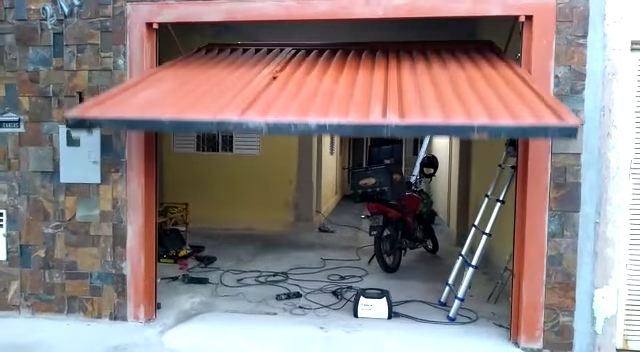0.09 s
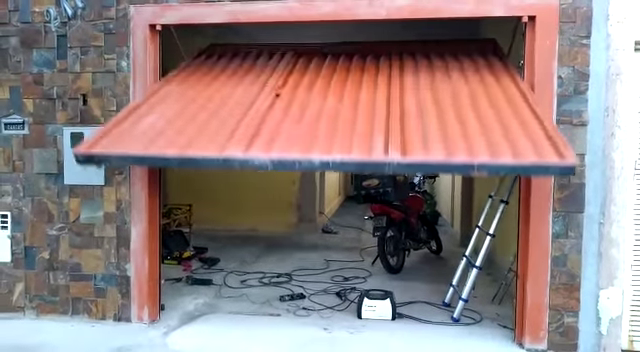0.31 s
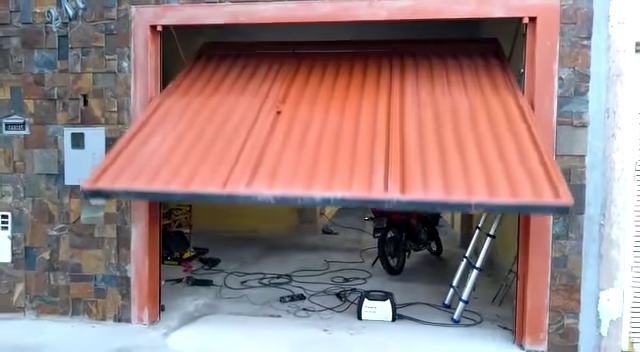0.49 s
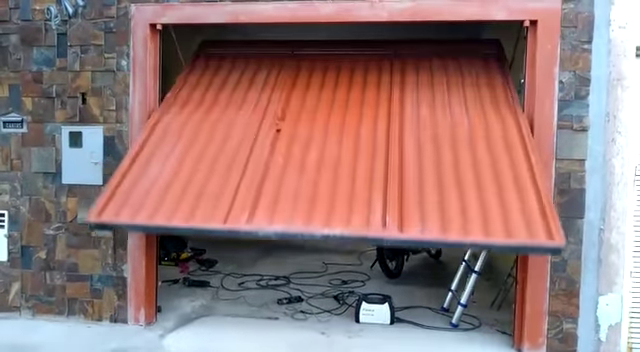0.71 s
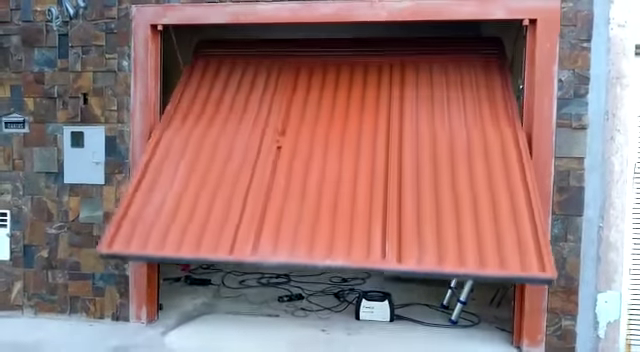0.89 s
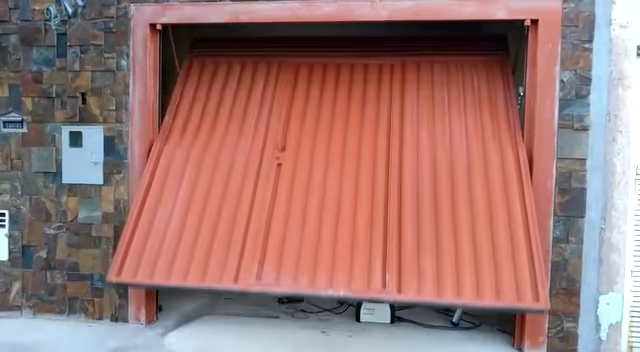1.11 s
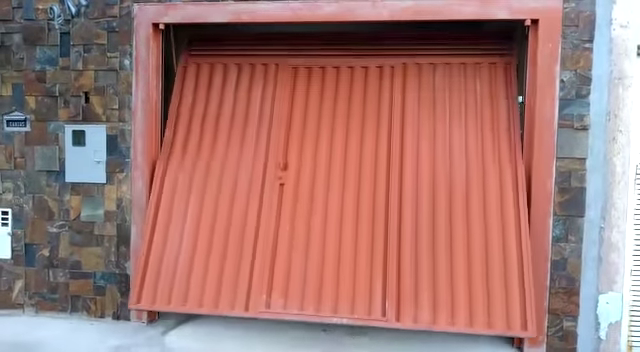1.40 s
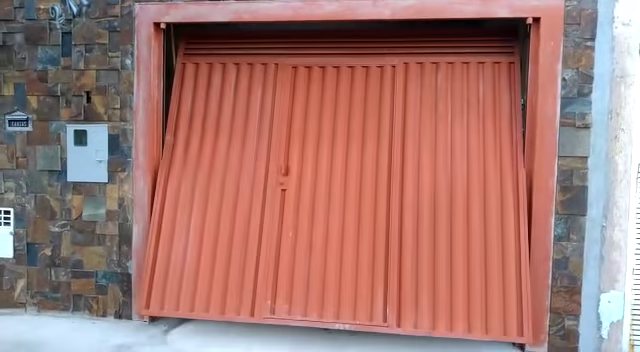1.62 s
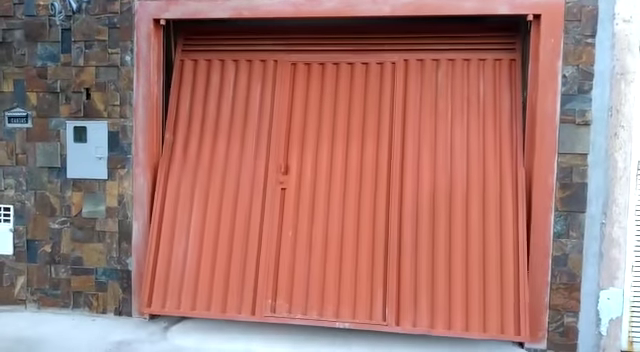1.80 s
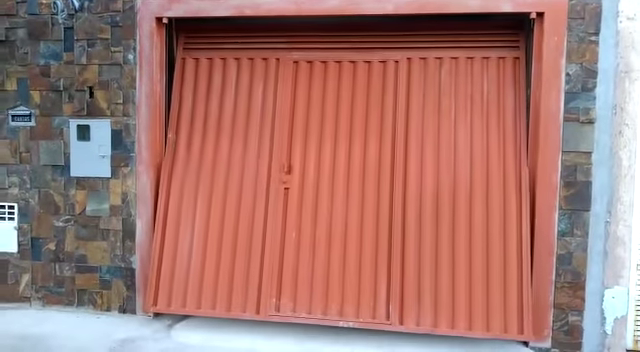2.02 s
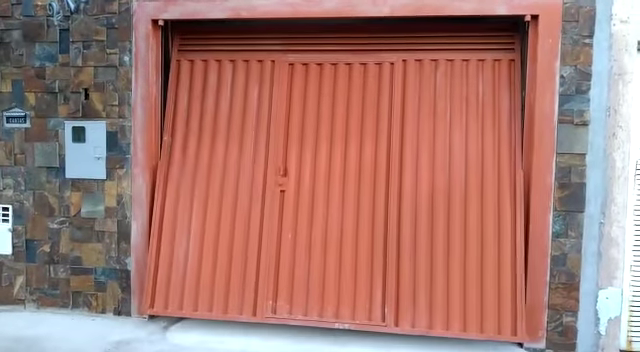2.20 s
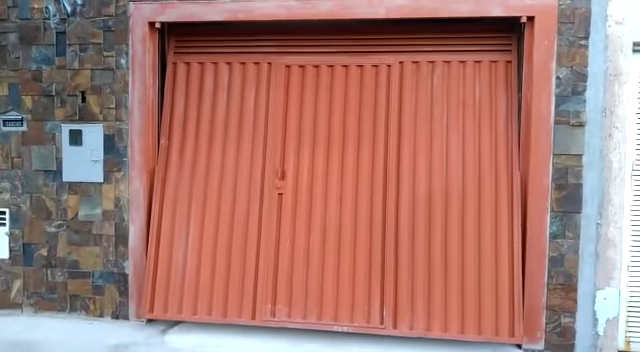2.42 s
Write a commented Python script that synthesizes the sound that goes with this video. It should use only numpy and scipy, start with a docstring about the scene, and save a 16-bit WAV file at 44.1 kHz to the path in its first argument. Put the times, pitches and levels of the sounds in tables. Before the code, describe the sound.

A steel garage gate swings closed with a hollow rumble, a short squeak and three clanks. The panel then rattles and booms as a dry pivot squeals. Outside, low gusts hit the microphone over a very faint high whine.

```python
"""A corrugated steel garage gate rumbles shut, swung by an electric opener and heard from the street.
Its lifting arms squeak and clank three times as the slack is taken up; rollers scrape in their guides.
The loose sheet rattles against its frame and booms as it comes upright.
A dry pivot sticks and slips, squealing into the garage.
Behind it all sits a faint high whine, and wind buffets the microphone."""
import sys
import numpy as np
from scipy import signal
from scipy.fft import rfft, irfft
from scipy.io import wavfile

SR = 44100
rng = np.random.default_rng(int(sys.argv[2]) if len(sys.argv) > 2 else 0)


def inscribe(sig):
    """Save sig as 16-bit PCM at rate SR to the path in sys.argv[1].

    A 1-D sig is mono; a 2-D sig holds one channel per row.
    Samples are clipped to [-1, 1] before scaling.
    """
    pcm = np.round(np.clip(np.atleast_2d(sig).T, -1, 1) * 32767)
    wavfile.write(sys.argv[1], SR, pcm.astype(np.int16))


N = 110250
TIME = np.arange(N) / SR
HZ = np.maximum(np.arange(N // 2 + 1) * SR / N, 1)


# fader ride of the shaking sheet: t/s, level/dB
RUMBLE_RIDE = [(0, -37.5), (.14, -37.5), (.26, -31.5), (.42, -31.5), (.52, -30.5), (.72, -32.5), (.97, -33),
               (1.12, -28), (1.28, -32.5), (1.37, -28), (1.7, -32), (2.05, -37.5), (2.25, -36.5),
               (2.5, -46)]
# EQ of the rumble: f/Hz, level/dB
RUMBLE_EQ = [(40, -61), (100, -10.5), (190, 3.5), (430, -4.5), (680, -0.5), (950, -8.5), (1400, -12),
             (2100, -23), (2900, -28.5), (4300, -36.5), (7500, -43), (14000, -52.5)]
# low panel modes: f/Hz, send from the shaking/dB, send from a clank/dB, t60/s
PANEL_MODES = [(107.5, -17, -20, 1.2), (169, -14, -26, 1.05), (360.3, -13.5, -6.5, 1.2),
               (630.3, -27, -2, 0.26)]
def rumble():
    """The travelling sheet shakes all over and hums in its low modes."""
    flutter = amp(.7 * drift(54))
    shaking = stereo_noise(RUMBLE_EQ, grain_db=2) * flutter
    hum = sum(amp(db) * ring(rng.standard_normal(N), hz, t60) for hz, db, _, t60 in PANEL_MODES)
    return amp(envelopes(RUMBLE_RIDE)[0]) * (shaking + hum)


# arm hits: t/s, level/dB, treble/dB, attack/s, decay/s, send to the sheet/dB
CLANK_CUES = [(0.462, -13, 6.5, 0.00019, 0.0073, -10), (0.583, -16, -6, 0.012, 0.031, -2),
              (1.045, -17, 7.5, 0.008, 0.012, -10)]
# modes of the lifting arms: f/Hz, level/dB, t60/s
ARM_MODES = [(735, -1.5, .045), (1020, -20, .04), (1380, -12, .03), (2100, -19, .025), (2750, -21, .03)]
def clanks():
    """The arms take up their slack: a crack, a short ring, and the sheet answers, with little bass."""
    body, contacts = 0, 0
    for t, db, treble_db, attack, decay, send_db in CLANK_CUES:
        force = amp(db) * chatter(t, attack, decay)
        contact = harden(force, treble_db)
        arms = sum(amp(mode_db) * ring(force, hz, t60) for hz, mode_db, t60 in ARM_MODES)
        panel = sum(amp(mode_db) * ring(force, hz, t60) for hz, _, mode_db, t60 in PANEL_MODES)
        body = body + arms + amp(send_db) * (panel + excite(contact, sheet_ring()))
        contacts = contacts + contact
    low_cut = signal.butter(2, 165, "high", fs=SR, output="sos")
    return signal.sosfilt(low_cut, body + excite(contacts, crack()))


# sheet hits: t/s, level/dB, treble/dB; the 0.562 s row is the arms' first catch, just before the second clank
RATTLE_CUES = [(0.292, -26, -29), (.562, -36, 16), (.874, -27, -21), (1.011, -35, -2), (1.321, -24, -1.5),
               (1.389, -19.5, -12), (1.41, -32, 7), (1.48, -26.5, 9), (1.552, -24, 8), (1.707, -23.5, 2),
               (1.834, -35, 4), (1.913, -29, 1), (2.185, -32, -11)]
def rattles():
    """The loose sheet chatters against its frame: a bare crack and the ring of the whole panel."""
    force = sum(amp(db) * harden(chatter(t, attack=.00044, decay=.015), treble_db)
                for t, db, treble_db in RATTLE_CUES)
    return excite(force, sheet_ring() + crack(db=-22.5))


# EQ of the struck sheet: f/Hz, level/dB
SHEET_EQ = [(50, -49), (170, 12.5), (420, -6.5), (700, 5.5), (1400, 1.5), (2100, -1), (3100, -9),
            (4300, -14.5), (5300, -18.5), (7800, -27.5), (10500, -28), (14000, -42)]
def sheet_ring():
    """A tight panel ring with a garage tail; every spot that is struck rings a little differently."""
    return dense_ring(SHEET_EQ, t60=.042) + amp(-3) * dense_ring(SHEET_EQ, t60=.65)


# EQ of the contact transient: f/Hz, level/dB
CRACK_EQ = [(1000, -16), (2300, 11), (5300, -2), (8000, -12), (10000, -4.5), (14000, -21)]
def crack(db=-23.5):
    """The bright, dry snap of steel meeting steel, as an impulse response."""
    return amp(db) * dense_ring(CRACK_EQ, t60=.016)


# sways of the gate: t/s, level/dB, t60/s
BOOM_CUES = [(1.391, -24.5, 0.21), (1.48, -30, 0.68), (1.62, -31.5, 0.96), (2.488, -31.5, .3)]
# EQ of the flexing panel: f/Hz, level/dB
BOOM_EQ = [(40, -16), (85, 2.5), (180, 5.5), (340, -5.5), (1200, -68)]
def booms():
    """The whole panel flexes with a low boom as the gate comes upright."""
    attack_s, power = .012, 0
    for t, db, t60 in BOOM_CUES:
        swell = np.exp(-np.maximum((t - TIME) / attack_s, np.log(1000) * (TIME - t) / t60))
        power = power + (amp(db) * swell) ** 2
    return np.sqrt(power) * stereo_noise(BOOM_EQ)


# fader ride of the rollers: t/s, level/dB
SCRAPE_RIDE = [(0, -53.5), (.35, -59), (.44, -45), (.5, -38.5), (.95, -66), (1.27, -49.5), (1.45, -37.5),
               (1.7, -39.5), (1.95, -42.5), (2.08, -53.5), (2.5, -62)]
# EQ of the scrape: f/Hz, level/dB
SCRAPE_EQ = [(500, -30), (1400, 6.5), (2100, 8), (3300, -1.5), (4300, -9.5), (5200, -10), (8000, -21),
             (14000, -37)]
# EQ of the sliding steel: f/Hz, level/dB
HISS_EQ = [(2000, -36), (5400, 11), (7500, -2), (12000, 3.5), (14000, -17)]
def rollers():
    """Gritty rubbing in the guides, with one bright, catching hiss of sliding steel."""
    swell = np.exp(-((TIME - 1.28) / .13) ** 2)
    hiss = amp(-52.5 + 3.5 * drift(12)) * swell * stereo_noise(HISS_EQ, grain_db=2.5)
    scrape = amp(envelopes(SCRAPE_RIDE)[0]) * stereo_noise(SCRAPE_EQ, grain_db=2.5)
    return scrape + hiss


# pitch and fader ride of the dry pivot: t/s, f/Hz, level/dB
SQUEAL_RIDE = [(1.578, 6780, -47), (1.592, 6666, -31), (1.608, 6600, -27), (1.635, 6520, -38.5),
               (1.66, 6920, -36), (1.688, 6780, -39), (1.705, 6600, -60)]
def squeal():
    """Stick and slip at a pivot: a rough, unsteady tone and its octave, echoing in the garage."""
    hz, db = envelopes(SQUEAL_RIDE)
    phase = 2 * np.pi * np.cumsum(hz + 115 * drift(354)) / SR
    slipping = (TIME > SQUEAL_RIDE[0][0]) & (TIME < SQUEAL_RIDE[-1][0])
    level = amp(db + 3 * drift(105)) * slipping
    tone = level * (np.sin(phase) + amp(-12) * np.sin(2 * phase))
    garage = rms_one(rng.standard_normal((2, N)) * tail(t60=.52)) / np.sqrt(N)
    pan_left = amp([[1], [-1]])
    return (tone + amp(-1.5) * excite(tone, garage)) * pan_left


def squeak():
    """A joint under growing load gives a short rising squeak before it lets go."""
    start_s, length_s, rise_hz_per_s = .38, .1, 6000
    age = np.clip(TIME - start_s, 0, length_s)
    hz = 2450 + rise_hz_per_s * age + 115 * drift(320)
    level = amp(-44) * np.sin(np.pi * age / length_s)
    return level * np.sin(2 * np.pi * np.cumsum(hz) / SR)


def high_whine():
    """Three faint, narrow bands of hiss near 11-12 kHz that fade out at 1.8 s."""
    width_hz, end_s, fade_s = 110, 1.8, .052
    whine = 0
    for hz in (10970, 11720, 12330):
        noise = rfft(rng.standard_normal((2, N)))
        whine = whine + rms_one(irfft(noise / (1 + ((HZ - hz) / width_hz) ** 2), N))
    return amp(-70) * whine * np.clip((end_s - TIME) / fade_s, 0, 1)


# fader ride of the gusts: t/s, level/dB
WIND_RIDE = [(0, -38), (.17, -39), (.21, -26.5), (.3, -37), (1.28, -40), (1.35, -21.5), (1.45, -34),
             (1.82, -32), (1.93, -22), (2.0, -27.5), (2.14, -20), (2.3, -24), (2.36, -30), (2.42, -25),
             (2.5, -21)]
# EQ of the buffeting: f/Hz, level/dB
WIND_EQ = [(15, -61), (40, 4), (65, 11), (100, 12.5), (170, 2), (300, -11), (1000, -60.5)]
def wind():
    """Low gusts on the microphone push the two channels in opposite directions."""
    return amp(envelopes(WIND_RIDE)[0]) * stereo_noise(WIND_EQ, correlation=-.91)


# stereo image of the gate: f/Hz, left-right correlation/(-1..1)
GATE_IMAGE = [(80, 1), (230, 0.94), (500, 0.81), (950, 1), (1800, 0.9), (12000, 0.78)]
def stereo_noise(eq, grain_db=0, correlation=None):
    """Shaped noise of rms 1, as wide as the gate by default; grain breaks it into uneven ticks."""
    if correlation is None:
        correlation = np.clip(spectrum(GATE_IMAGE), -.99, .99)
    mid, side = rfft(rng.standard_normal((2, N)) * amp(grain_db * drift(330)))
    pair = np.sqrt(1 + correlation) * mid + np.sqrt(1 - correlation) * side * [[1], [-1]]
    return rms_one(irfft(amp(spectrum(eq)) * pair, N))


def chatter(t, attack, decay, contacts_per_s=3500):
    """A burst of loose metal contacts that swells to time t and dies away."""
    shape = np.exp(-np.maximum((t - TIME) / attack, (TIME - t) / decay))
    ticks = (rng.random(N) < contacts_per_s / SR) * rng.choice([-1, 1], N)
    strength = amp(.5 * rng.standard_normal(N))
    return rms_one(ticks * strength * shape) * np.sqrt(np.mean(shape ** 2))


def harden(force, treble_db, crossover_hz=1970):
    """A high shelf: a harder contact has more treble."""
    split = [signal.butter(2, crossover_hz, kind, fs=SR, output="sos") for kind in ("low", "high")]
    low, high = (signal.sosfilt(np.vstack([sos, sos]), force) for sos in split)
    return low + amp(treble_db) * high


def ring(force, hz, t60):
    """One mode, carrying as much energy as the force that drives it."""
    radius, angle = np.exp(-np.log(1000) / (t60 * SR)), 2 * np.pi * hz / SR
    mode = signal.lfilter([1], [1, -2 * radius * np.cos(angle), radius ** 2], force + 1e-18)
    return rms_one(mode) * np.std(force)


def dense_ring(eq, t60):
    """Response of countless modes, energy 1; t60 holds at 1 kHz and lower octaves hang on longer."""
    noise, response = rfft(stereo_noise(eq)), 0
    for hz in 1000 * 2. ** np.arange(-5, 5):
        octave = irfft(noise * np.maximum(1 - abs(np.log2(HZ / hz)), 0), N)
        octave_t60 = t60 * (1000 / hz) ** .25
        response = response + octave * tail(octave_t60) / np.sqrt(octave_t60)
    return rms_one(response) / np.sqrt(N)


def excite(force, response):
    """Play a force through an impulse response."""
    return signal.fftconvolve(np.atleast_2d(force), response, axes=1)[:, :N]


def tail(t60):
    """A decay that drops 60 dB in t60 seconds."""
    return np.exp(-np.log(1000) * TIME / t60)


def drift(rate_hz):
    """Random modulation of rms 1, rolling off above rate_hz."""
    return rms_one(irfft(rfft(rng.standard_normal(N)) / (1 + (HZ / rate_hz) ** 2), N))


def envelopes(ride):
    """One automation curve for each column after the time."""
    times, *columns = np.transpose(ride)
    return [np.interp(TIME, times, column) for column in columns]


def spectrum(points):
    """Join breakpoints on a log-frequency axis."""
    hz, values = np.transpose(points)
    return np.interp(np.log(HZ), np.log(hz), values)


def amp(db):
    """Decibels to gain."""
    return 10 ** (np.asarray(db) / 20)


def rms_one(x):
    """Scale to rms 1."""
    return x / np.sqrt(np.mean(x ** 2) + 1e-20)


def lean_left(mix, lead_s=.0004714, above_hz=1062):
    """The treble reaches the left channel earlier and a little louder."""
    hz, sides = np.arange(N + 1) * SR / (2 * N), np.array([[1], [-1]])
    phase = np.pi * lead_s * np.maximum(hz - above_hz, 0)
    pan_db = .5 + hz / 14250
    mirrored = np.hstack([mix, mix[:, ::-1]])  # keeps the ends smooth
    return irfft(rfft(mirrored) * amp(sides * pan_db) * np.exp(1j * sides * phase))[:, :N]


def scene():
    """The closing gate over a faint high whine and the wind, all leaning left."""
    gate = rumble() + clanks() + rattles() + booms() + rollers() + squeal() + squeak()
    return lean_left(gate + high_whine() + wind())


def record(dry):
    """A steep high cut at 14250 Hz."""
    return signal.sosfilt(signal.ellip(10, .1, 80, 14250, fs=SR, output="sos"), dry)


dry = scene()
out = record(dry)
inscribe(out)
```